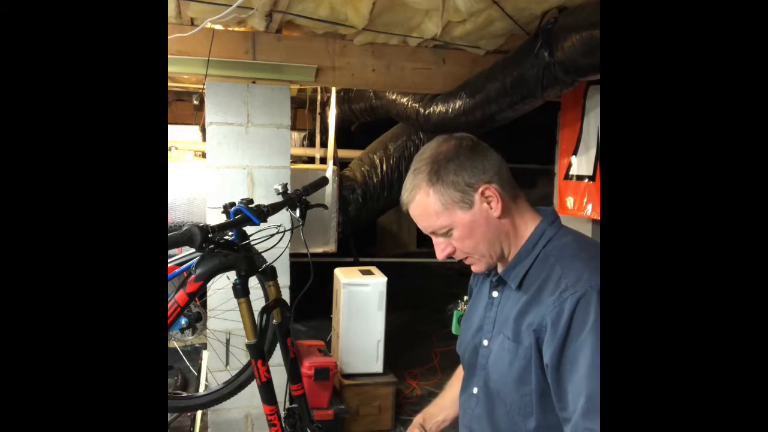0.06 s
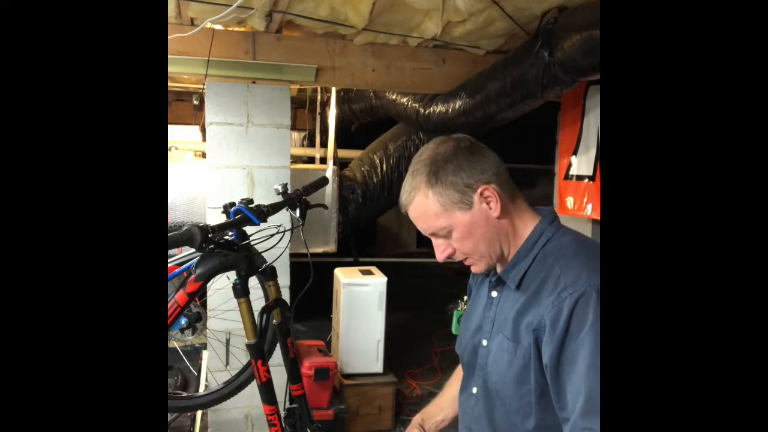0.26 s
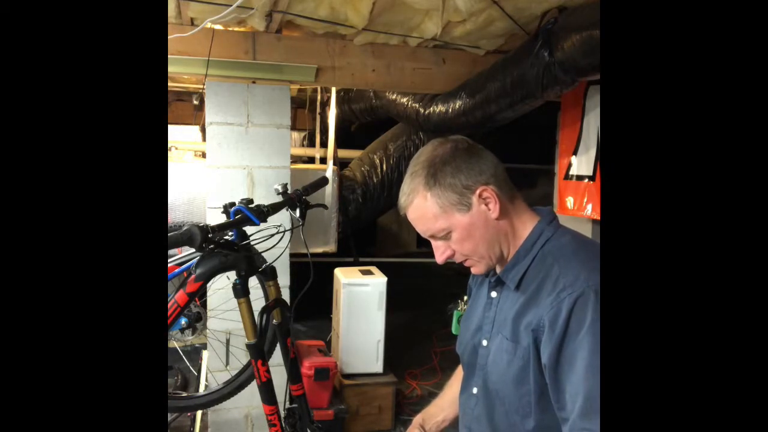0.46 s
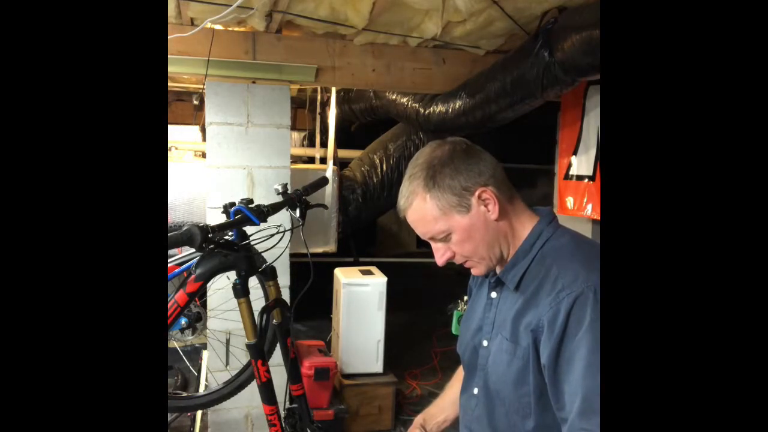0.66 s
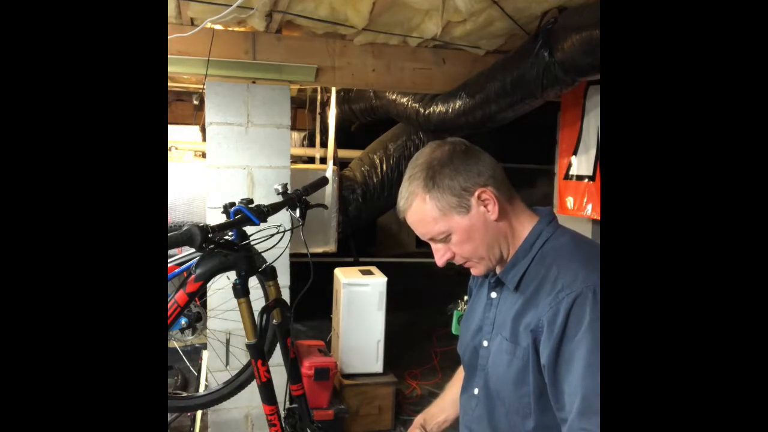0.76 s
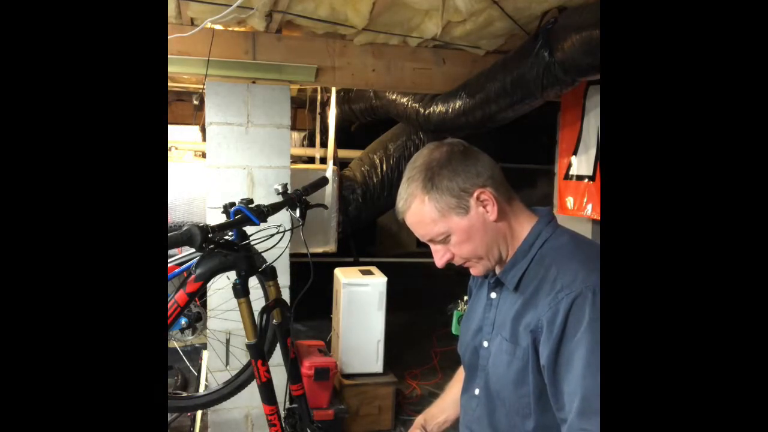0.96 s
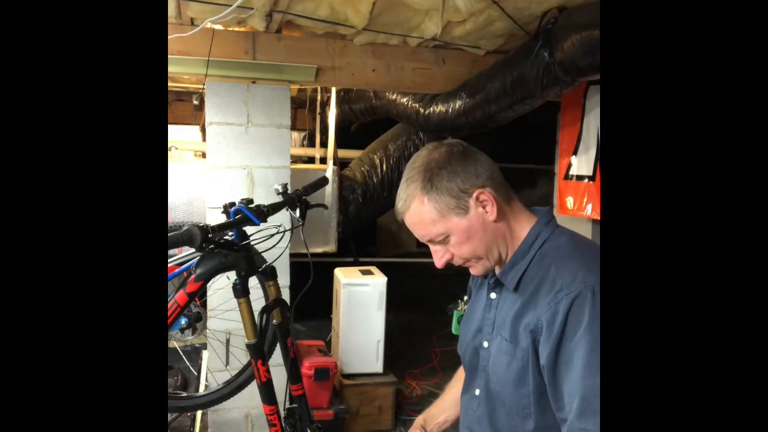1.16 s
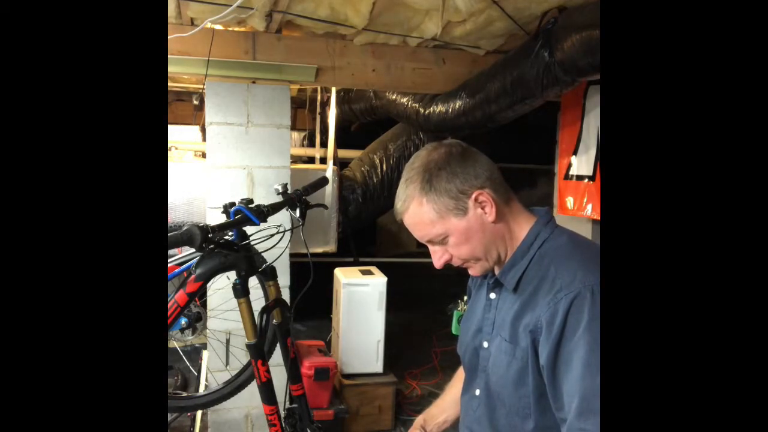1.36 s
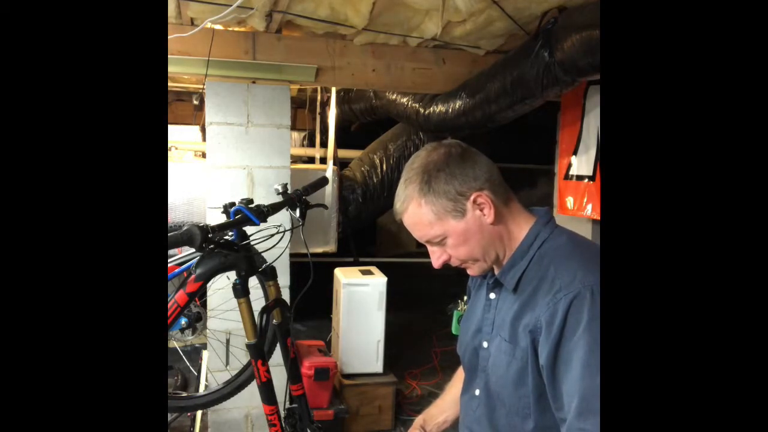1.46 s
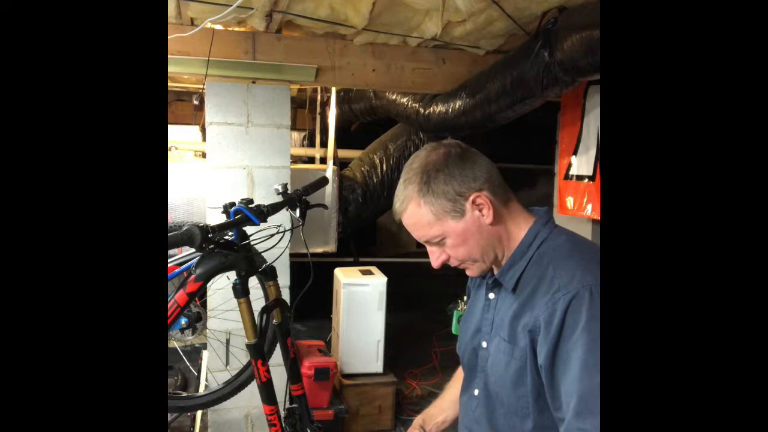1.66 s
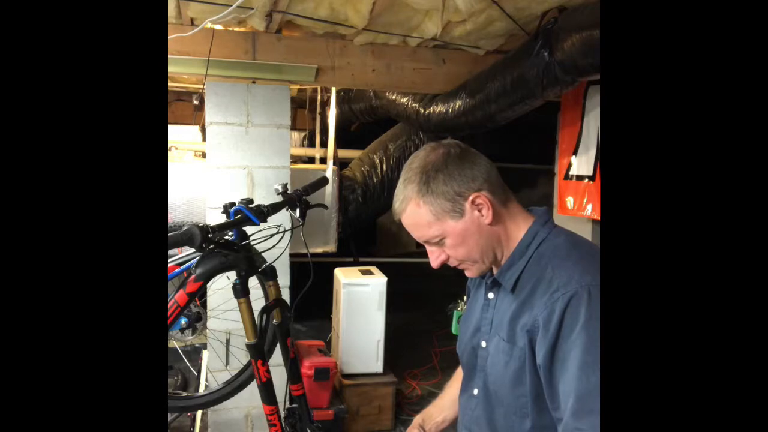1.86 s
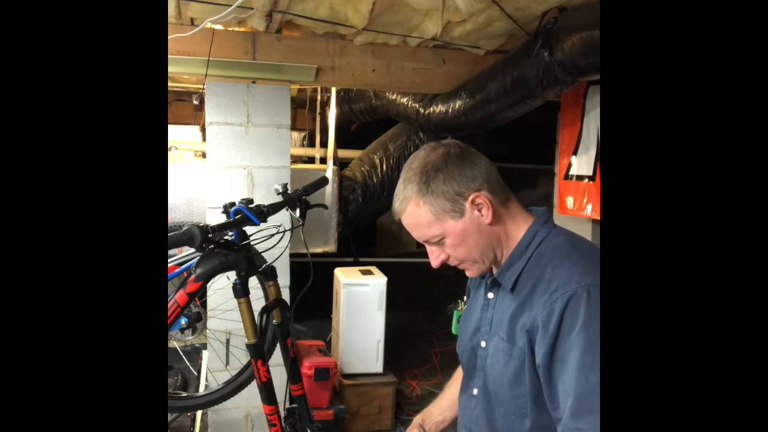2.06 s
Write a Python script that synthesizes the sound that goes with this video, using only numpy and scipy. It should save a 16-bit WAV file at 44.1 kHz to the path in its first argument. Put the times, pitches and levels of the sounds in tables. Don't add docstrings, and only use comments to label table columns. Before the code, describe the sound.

One sharp, ringing pop as a bicycle tyre snaps onto its rim over steady air hiss

```python
import sys
import numpy as np
from scipy import signal
from scipy.fft import rfft, irfft
from scipy.io import wavfile

SR = 44100
rng = np.random.default_rng(int(sys.argv[2]) if len(sys.argv) > 2 else 0)


def to_linear_factor(level_db):
    exponent = np.asarray(level_db, float) / 20
    return 10 ** exponent


def wav_record(signal):
    frames = np.transpose(np.atleast_2d(signal))
    bounded = np.clip(frames, -1, 1)
    quanta = np.round(bounded * 32767).astype(np.int16)
    wavfile.write(sys.argv[1], SR, quanta)


N = 92610
SNAP_S = .2172


def rms_one(x):
    return x / np.sqrt(np.mean(x ** 2) + 1e-20)


def at_hz(points, hz):
    table = np.array(points)
    return np.interp(np.log(hz), np.log(table[:, 0]), table[:, 1])


def drift(rate_hz):
    r = np.exp(-80 * np.pi * rate_hz / SR)
    slow = signal.lfilter([1], [1, -2 * r, r * r], rng.standard_normal(N // 40 + 2002))
    slow = rms_one(slow[2000:])
    return np.interp(np.arange(N) / 40, np.arange(len(slow)), slow)


def ring(clicks, hz, t60):
    r = to_linear_factor(-60 / (max(t60, .002) * SR))
    w = 2 * np.pi * hz / SR
    return signal.lfilter([0, np.sin(w)], [1, -2 * r * np.cos(w), r * r], clicks + 1e-18)


def click(at_s, level_db):
    x = np.zeros(N)
    x[int(at_s * SR)] = to_linear_factor(level_db)
    return x


def narrow(hz, width_hz):
    t60 = np.log(1000) / np.pi / max(width_hz, .5)
    return rms_one(ring(rng.standard_normal(N + SR), hz, t60)[SR:])


def bands(spectrum, shape):
    hz = np.fft.rfftfreq(N, 1 / SR) + 1e-3
    lowest, highest = spectrum[0][0], spectrum[-1][0]
    skirt = 1 / (1 + (lowest / hz) ** 6) / (1 + (hz / highest) ** 6)
    noise = rfft(rng.standard_normal(N)) * to_linear_factor(at_hz(spectrum, hz)) * np.sqrt(skirt)
    noise = noise / np.std(irfft(noise, N))
    place = 3 * np.log2(hz / 20)
    total = np.zeros(N)
    for k in range(31):
        window = np.cos(np.pi / 2 * np.clip(place - k, -1, 1)) ** 2
        total += irfft(noise * window, N) * shape(20 * 2 ** (k / 3))
    return total


def since_snap():
    return np.maximum(np.arange(N) / SR - SNAP_S, 0)


# frequency in Hz, level in dB per Hz.
JET = [(1800, -11), (2400, -7.5), (3100, -9.5), (5000, -8), (6800, -5.5), (9600, -7.5), (12200, -3),
       (18000, -4)]


def air_jet():
    hiss_db, flicker_db = -47.5, -0.12
    together = drift(4.4)
    hiss = to_linear_factor(hiss_db) * bands(JET, lambda hz: to_linear_factor(flicker_db * (0.46 * together + drift(21))))
    ripple_t60_s, ripple_db = .12, -10
    t = np.arange(4000) / SR
    echoes = rng.standard_normal(4000) * to_linear_factor(-60 * t / ripple_t60_s)
    echoes = to_linear_factor(ripple_db) * echoes / np.sqrt(np.sum(echoes ** 2))
    return hiss + signal.fftconvolve(hiss, echoes)[:N]


# frequency in Hz, width in Hz, level in dB.
WHISTLES = [(2210, 71, -9.5), (2645, 110, -19.5), (6070, 67, -2.5), (7445, 65, -5), (7690, 90, -2.5),
            (11700, 250, -1.5), (12190, 70.7, -11), (12650, 90, -9.5), (12785, 90, 4), (13370, 80, -14),
            (14200, 97, -3), (15440, 150, 2)]


def valve_whistles():
    total = np.zeros(N)
    for hz, width, db in WHISTLES:
        total += to_linear_factor(-61 + db + 2.0 * drift(3.1)) * narrow(hz, width)
    return total


# frequency in Hz, level in dB per Hz.
RUMBLE = [(15, -47), (25, -9), (119, -1), (178, -13.5), (506, -10), (654, -19.5), (876, -20), (1630, -29),
          (2000, -33.5), (2600, -45.5), (4400, -120)]


def fan_rumble():
    rumble_db, flicker_db = -53, 1.5
    return to_linear_factor(rumble_db) * bands(RUMBLE, lambda hz: to_linear_factor(flicker_db * drift(3.2)))


# frequency in Hz, width in Hz, level in dB rms.
HUMS = [(129.6, 8, -67.5), (55.4, 10, -55), (217, 12, -67), (550, 4.7, -87.5)]
# (each sine peaks 1.5 dB above this level, so its rms sits
# about 1.5 dB below it).
TONES = [(120, -55), (883, -73.5)]


def hums():
    t = np.arange(N) / SR
    wavering = sum(to_linear_factor(db) * narrow(hz, width) for hz, width, db in HUMS)
    steady = sum(to_linear_factor(db + 1.5) * np.sin(2 * np.pi * hz * t) for hz, db in TONES)
    return wavering + steady


SLIP_S = [
    .2060,
    .2090,
    .2125,
    .2167,
    .2171,
    .2200,
    .2252,
    .2282,
    .2775,
    .3080,
]
SLIP_DB = [-42, -44, -40, -17, -3, -13, -17, -15, -23, -31]
# frequency in Hz, level in dB, time to fall 60 dB in seconds.
CRACK = [(640, -10, .035), (1130, -1, .03), (1420, -11, .025), (2550, -7, .007), (3500, -15, .012),
         (5000, -20, .005), (6800, -26, .004), (9000, -32, .003), (11500, -32, .003), (15000, -33, .003)]


def bead_slips():
    clicks = np.zeros(N)
    clicks[(np.array(SLIP_S) * SR).astype(int)] = to_linear_factor(np.array(SLIP_DB))
    knocks = np.zeros(N)
    for hz, db, t60 in CRACK:
        direction = np.sign(hz - 2000)
        knocks += direction * to_linear_factor(db) * ring(clicks, hz, t60)
    return signal.sosfilt(signal.butter(2, 300, "high", fs=SR, output="sos"), knocks)


# frequency in Hz, level in dB, time to fall 60 dB in seconds.
WHEEL = [(160.4, -12, 0.83), (311.4, -1, .25), (335.3, -9.5, .15), (371, -15.5, 0.96), (404, -18.5, 0.91),
         (474, 4, 0.23), (597, -8.5, 0.25), (711, -24.5, 0.91), (809, 4.5, 0.093), (970, -5.5, .15),
         (1082, -13, 0.17), (1171, -4, .2), (1346, -3.5, .13), (1482, -11.5, 0.36)]


def wheel_ring():
    wobble_db_per_khz, wobble_per_s, rise_hz = 2.5, 25, 25
    snap = click(SNAP_S, -24)
    wheel = np.zeros(N)
    for k, (hz, db, t60) in enumerate(WHEEL):
        wobble_db = wobble_db_per_khz * hz / 1000 * drift(wobble_per_s)
        wheel += (-1) ** k * to_linear_factor(db + wobble_db) * ring(snap, hz, t60)
    return wheel * (1 - np.exp(-2 * np.pi * rise_hz * since_snap()))


# frequency in Hz, level in dB.
TAIL = [(120, -33), (200, -8), (445, -8), (800, -2.5), (1500, -5.5), (3300, -16), (5000, -24), (16000, -39)]
# frequency in Hz, time to fall 60 dB in seconds.
EARLY_T60 = [(150, 0.2), (600, 0.073), (2000, 0.1), (4000, 0.095), (8000, 0.078)]
# frequency in Hz, time to fall 60 dB in seconds.
LATE_T60 = [(150, 0.5), (500, 0.654), (1500, 0.6), (8000, 0.27)]


def room_tail():
    early_db, late_db, rise_s = -13.5, -38, .005
    grain_db, grain_per_s = 2, 60
    since = since_snap()

    def fade(hz):
        early = to_linear_factor(early_db - 60 * since / at_hz(EARLY_T60, hz))
        late = to_linear_factor(late_db - 60 * since / at_hz(LATE_T60, hz))
        return to_linear_factor(grain_db * drift(grain_per_s)) * (early + late)

    return (1 - np.exp(-since / rise_s)) * bands(TAIL, fade)


# time in seconds, lowest Hz, highest Hz.
FLECKS = [(.424, 11700, 13100), (.447, 12400, 14500), (.819, 5200, 6900), (.888, 7600, 9000),
          (1.097, 5200, 6300), (1.097, 11700, 14500), (1.283, 11700, 13800), (1.538, 5200, 6300),
          (1.654, 11700, 13100), (1.701, 4700, 5700), (1.840, 8300, 9600), (2.003, 9600, 11000),
          (2.072, 12400, 13800)]


def channel_flecks():
    db_per_hz, length_s = -91.5, 0.041
    hz, t = np.fft.rfftfreq(N, 1 / SR), np.arange(N) / SR
    white = rfft(rng.standard_normal(N)) * to_linear_factor(db_per_hz) * np.sqrt(SR / 2)
    total = np.zeros(N)
    for middle_s, low, high in FLECKS:
        swell = np.cos(np.pi * np.clip((t - middle_s) / length_s, -.5, .5))
        total += irfft(white * (hz > low) * (hz < high), N) * swell
    return total


def soft_bump():
    return ring(click(.756, -45), 70, .12)


def bead_tick():
    return ring(click(.7635, -42), 980, .015)


def scene():
    air = air_jet() + valve_whistles()
    workshop = fan_rumble() + hums() + soft_bump()
    bead = bead_slips() + wheel_ring() + bead_tick()
    return np.tile(air + workshop + bead + room_tail(), (2, 1))


def low_pass(x):
    return signal.sosfilt(signal.butter(12, 16930, fs=SR, output="sos"), x)


def record(dry):
    low_cut_hz, top_cut_hz = 65, 15740
    x = signal.sosfilt(signal.butter(3, low_cut_hz, "high", fs=SR, output="sos"), dry)
    x = irfft(rfft(x) * (np.fft.rfftfreq(N, 1 / SR) < top_cut_hz), N)
    mix = x + channel_flecks() * [[1], [-1]]
    return low_pass(mix)


dry = scene()
out = record(dry)
wav_record(out)
```